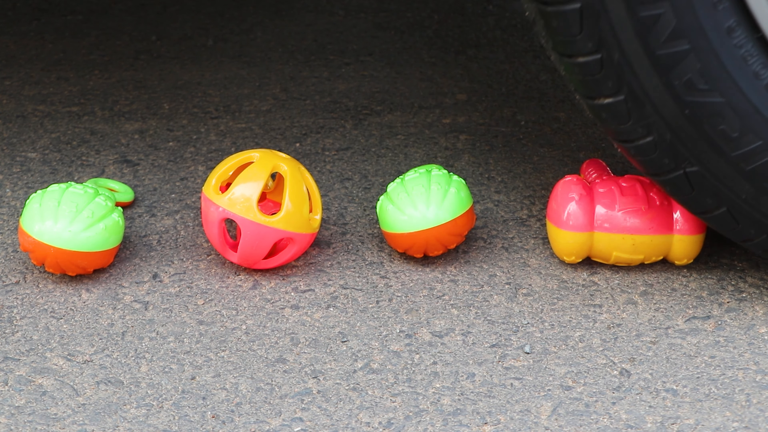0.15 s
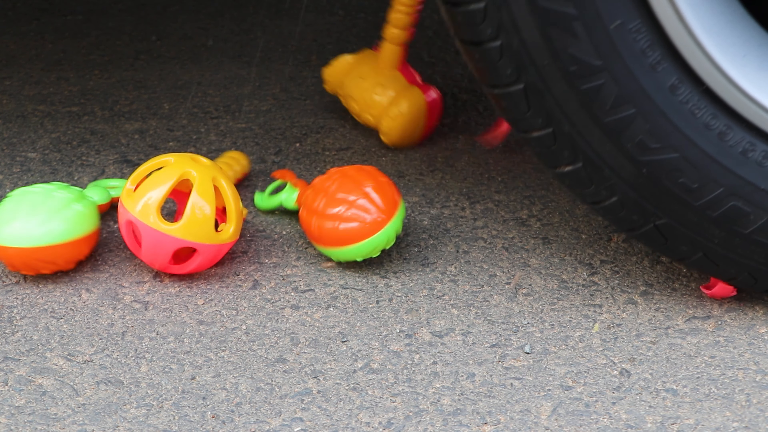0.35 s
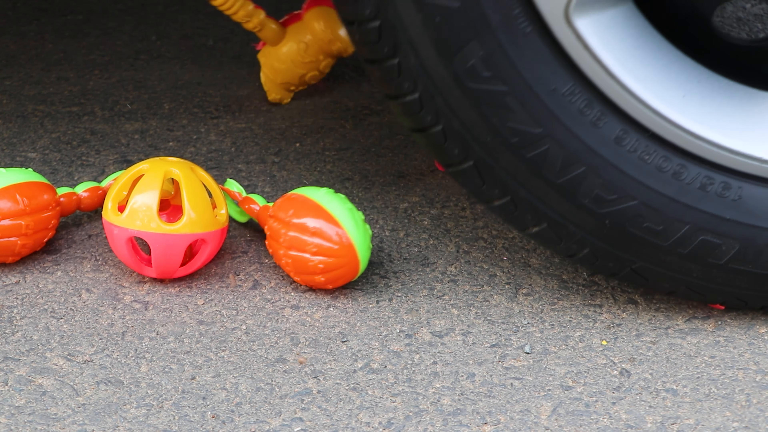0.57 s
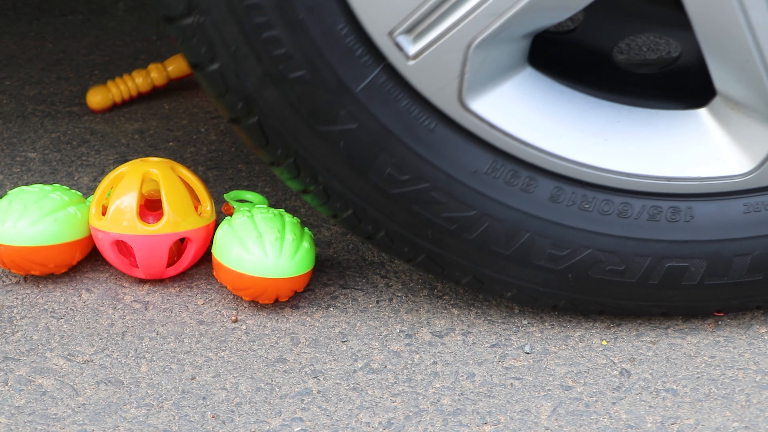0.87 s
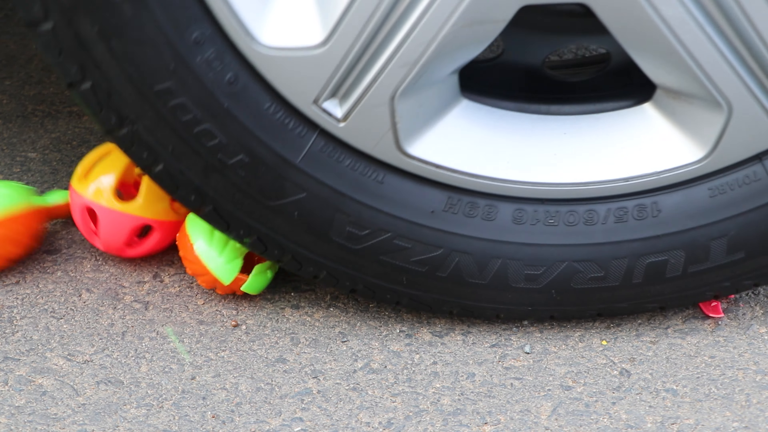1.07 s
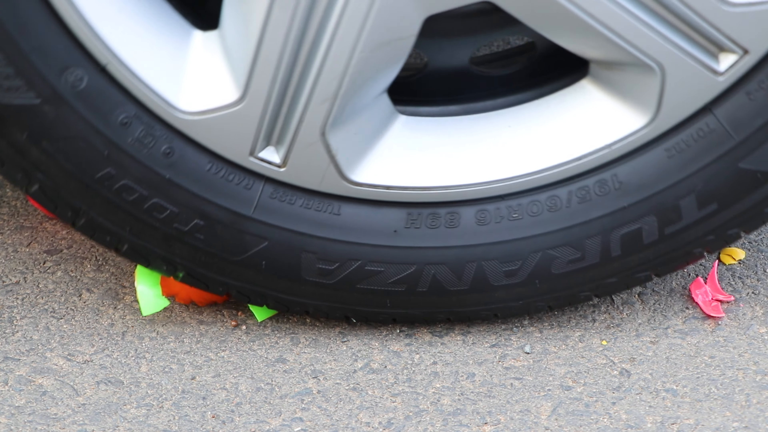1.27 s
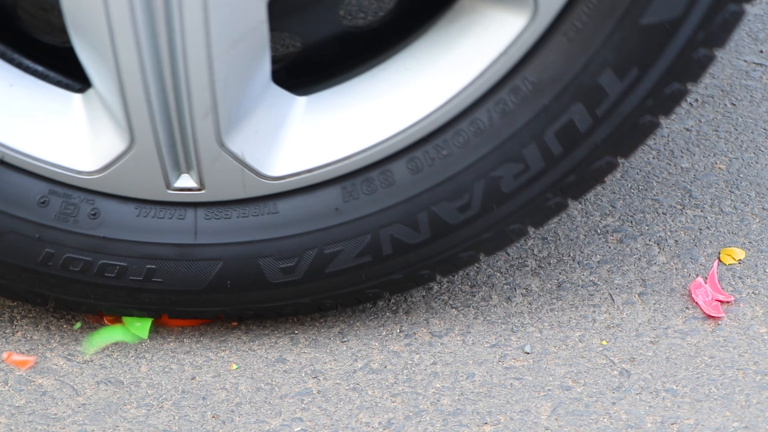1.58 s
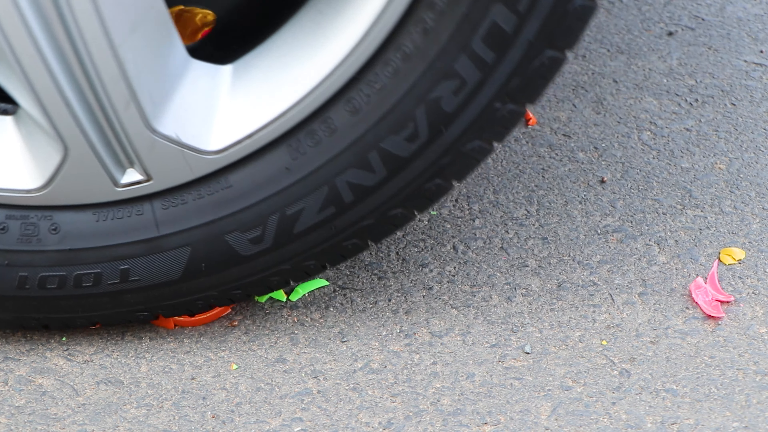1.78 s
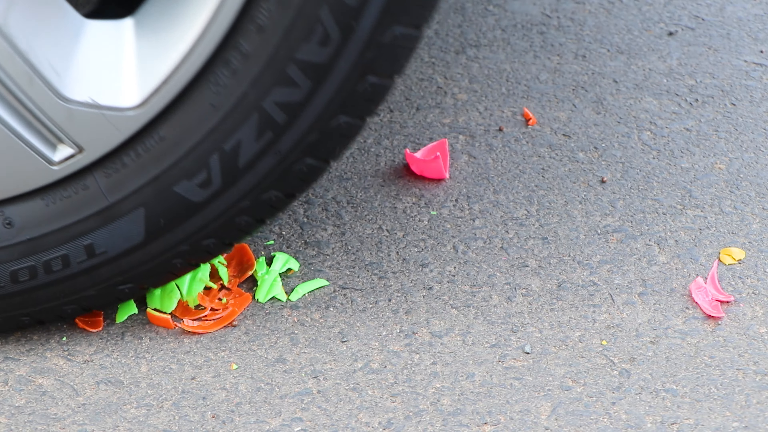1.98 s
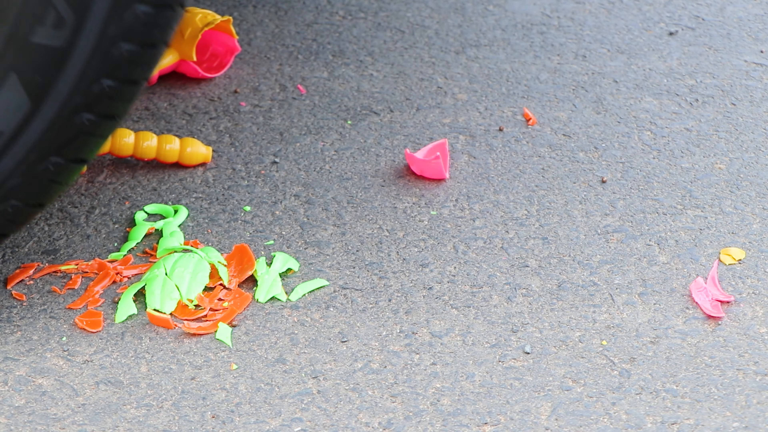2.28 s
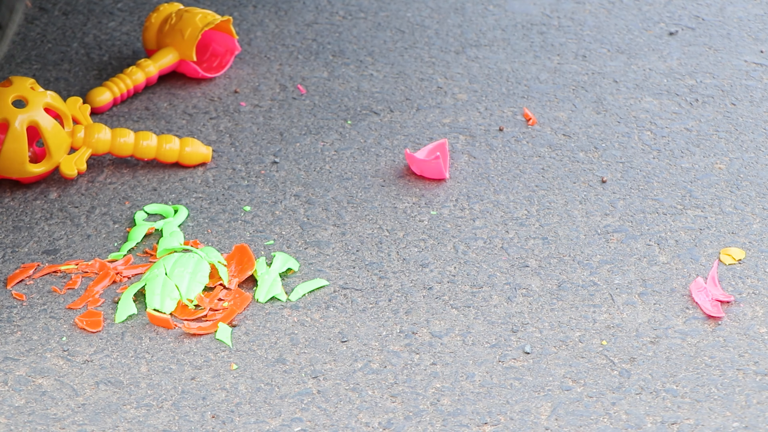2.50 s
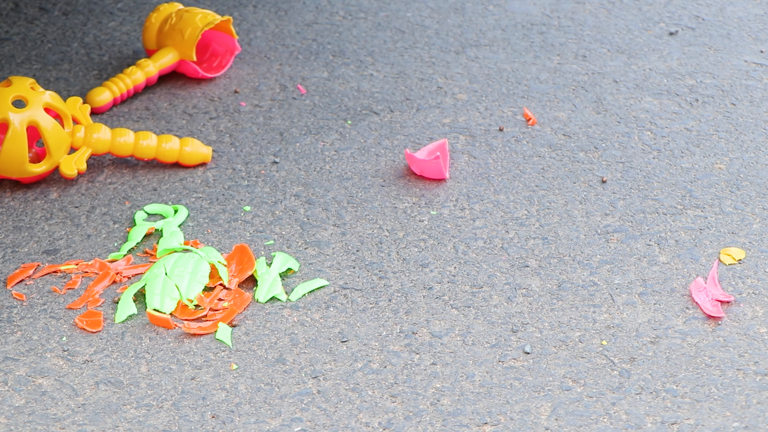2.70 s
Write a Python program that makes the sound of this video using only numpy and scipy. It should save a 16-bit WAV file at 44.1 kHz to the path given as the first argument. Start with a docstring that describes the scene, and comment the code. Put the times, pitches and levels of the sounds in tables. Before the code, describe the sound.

Close to the ground outdoors, a rolling tyre breaks plastic rattles; sharp opening cracks give way to clattering beads and shards, then thick crunching, a dull thump, a brief lull and sparse final snaps.

```python
"""Hollow hard-plastic rattles crack and knock under a slowly rolling car tyre, on asphalt beside a quiet street.
The microphone is close to the ground. Each break and its splinters ring shell, wall and fizz resonances.
Flurries of ticks make beads and shards rattle; heavy blows thump and faintly ring the air in the tyre.
The car's underside returns a short noise-like tail, filtered noise is the street, a few thin edges ping,
and the loudest cracks overload the recorder."""
import sys
import numpy as np
from scipy import signal
from scipy.fft import rfft, irfft
from scipy.io import wavfile

SR = 44100
rng = np.random.default_rng(int(sys.argv[2]) if len(sys.argv) > 2 else 0)


def wav_record(signal):
    """Record a signal, one row per channel, as 16-bit PCM in the file named by sys.argv[1]."""
    frames = np.transpose(np.atleast_2d(signal))
    bounded = np.clip(frames, -1, 1)
    # unit amplitude maps onto the largest positive 16-bit level
    quanta = np.round(bounded * 32767).astype(np.int16)
    wavfile.write(sys.argv[1], SR, quanta)


def volts(x):
    """Linear amplitude factor 10**(x/20) for a level x in dB, scalar or array-like."""
    e = np.asarray(x, float) / 20
    return 10 ** e


N = 125685
FIZZ_BAND_HZ = 8700, 15500  # shared by cracks and rattle


def rms_one(x):
    """Scales to rms 1."""
    return x / np.sqrt(np.mean(x ** 2) + 1e-20)


def in_time(rows):
    """Columns joined by straight lines in time."""
    s, *columns = np.transpose(rows)
    return [np.interp(np.arange(N) / SR, s, column) for column in columns]


def colour(x, points):
    """Minimum-phase filter through (frequency [Hz], gain [dB]) points on a log-frequency axis."""
    size = 4096
    hz, db = np.transpose(points)
    bins_hz = np.arange(size // 2 + 1) * SR / size
    gain = volts(np.interp(np.log(bins_hz + 1), np.log(hz), db))
    # folding the cepstrum onto positive times gives minimum phase
    cepstrum = irfft(np.log(gain))
    cepstrum[1:size // 2] *= 2
    cepstrum[size // 2 + 1:] = 0
    impulse = irfft(np.exp(rfft(cepstrum)))
    return signal.fftconvolve(x, impulse)[:len(x)]


def band(x, low_hz, high_hz):
    """Butterworth band-pass."""
    sos = signal.butter(3, [low_hz, min(high_hz, .45 * SR)], "band", fs=SR, output="sos")
    return signal.sosfilt(sos, x)


def ring(drive, hz, t60):
    """Two-pole resonance: a unit click starts a sine of height 1 that falls 60 dB in t60 seconds."""
    r, w = volts(-60 / (t60 * SR)), 2 * np.pi * hz / SR
    return signal.lfilter([0, np.sin(w)], [1, -2 * r * np.cos(w), r * r], drive + 1e-18)


def clicks(shape, per_s, spread_db):
    """Random clicks of either sign, at least 1 high, with a long-tailed size."""
    size = volts(spread_db * np.minimum(rng.exponential(1, shape), 4)) * rng.choice([-1, 1], shape)
    return size * (rng.random(shape) < per_s / SR)


# spectrum of the street behind the microphone: (frequency [Hz], relative density [dB])
STREET_SPECTRUM = [(18, -44), (30, -18), (106, -1.5), (259, -10.5), (512, -2), (760, 0), (2900, -3.5),
                   (5200, -19.5), (16000, -50.5)]
# how loud the street lies below the toys: (time [s], level [dB])
STREET_LEVELS = [(0, -65), (1.2, -67), (1.9, -62.5), (2.1, -79), (2.5, -70), (2.68, -81.5), (2.85, -81)]


def street():
    """Quiet outdoor noise, steady in colour, that sinks unevenly."""
    level_db, = in_time(STREET_LEVELS)
    noise = colour(rng.standard_normal(N + 4096), STREET_SPECTRUM)[4096:]  # skips the filter's start
    return volts(level_db) * rms_one(noise)


# beads and shards on the asphalt close to the microphone:
# (time [s], bright level [dB], hollow level [dB], fizz level [dB])
RATTLE_LEVELS = [(.19, -62.5, -81, -90.5), (.22, -46, -58.5, -45.5), (.27, -41, -34.5, -57),
                 (.37, -55.5, -73, -80), (.39, -31, -37, -63), (.47, -30.5, -55.5, -50),
                 (.52, -34.5, -45.5, -70), (.62, -36.5, -54.5, -59.5), (.7, -36, -75, -61.5),
                 (.8, -49.5, -51.5, -86.5), (.865, -47.5, -73, -77), (.88, -33.5, -28.5, -69),
                 (.945, -47.5, -76, -83), (.965, -45.5, -48.5, -74.5), (1.01, -37, -33.5, -79),
                 (1.035, -41, -63, -67.5), (1.07, -31, -40, -70), (1.13, -31, -50, -48),
                 (1.18, -46, -55.5, -68.5), (1.26, -38, -45.5, -53), (1.45, -44, -55, -69),
                 (1.64, -50.5, -54, -74.5), (1.7, -63, -57, -71.5), (1.84, -73.5, -65.5, -101),
                 (2.09, -71.5, -78, -104), (2.128, -32, -45, -42.5), (2.2, -54.5, -61, -82.5),
                 (2.3, -54.5, -57, -72), (2.502, -86, -71, -100), (2.509, -42, -39, -76.5),
                 (2.56, -70, -67.5, -91.5), (2.7, -91, -95, -105)]
# centre of the bright rattle: (time [s], pitch [Hz])
BRIGHT_PITCH = [(.39, 3600), (.45, 4270), (.52, 3820), (.8, 4900), (.88, 3400), (.93, 4480), (1.3, 3840),
                (1.84, 3450), (2.1, 3700), (2.4, 3400), (2.53, 4430)]
TICKS_PER_S, TICK_SPREAD_DB = 4500, 2.8
TUMBLES_PER_S, TUMBLE_SPREAD_DB, TUMBLE_DECAY_S = 120, 1.6, .007
TICK_BED = 1.5  # tick size between tumbles
BRIGHT_RANGE_HZ, BRIGHT_WIDTH_OCT, BRIGHT_CYCLES = (1900, 6970), .33, 55  # cycles to fall 60 dB
HOLLOW_HZ, HOLLOW_CYCLES = [970, 1040, 1130, 1204, 1366, 1736], 40
FIZZ_WASH = .35  # steady noise against rms-1 ticks


def rattle():
    """Tumbles set off flurries of ticks that ring bright resonances near the current pitch and hollow modes."""
    bright_db, hollow_db, fizz_db = in_time(RATTLE_LEVELS)
    centre_hz, = in_time(BRIGHT_PITCH)
    tumbles = np.abs(clicks(N, TUMBLES_PER_S, TUMBLE_SPREAD_DB))
    flurry = signal.lfilter([1], [1, -np.exp(-1 / (TUMBLE_DECAY_S * SR))], tumbles)
    ticks = clicks(N, TICKS_PER_S, TICK_SPREAD_DB) * (TICK_BED + flurry)

    # three ticks in four share their tumble's resonances, the others pick their own
    of_tumble = rng.integers(0, 84, N)[np.cumsum(tumbles > 0)]
    dealt = np.where(rng.random(N) < .75, of_tumble, rng.integers(0, 84, N))

    bright = np.zeros(N)
    pitches = np.geomspace(*BRIGHT_RANGE_HZ, 14)
    for k, hz in enumerate(pitches):
        nearness = np.exp(-.5 * (np.log2(hz / centre_hz) / BRIGHT_WIDTH_OCT) ** 2)
        bright += ring(ticks * nearness * (dealt % len(pitches) == k), hz, BRIGHT_CYCLES / hz)
    hollow = np.zeros(N)
    for k, hz in enumerate(HOLLOW_HZ):
        hollow += ring(ticks * (dealt % len(HOLLOW_HZ) == k), hz, HOLLOW_CYCLES / hz)
    fizz = rms_one(ticks * np.sqrt(flurry)) + FIZZ_WASH * rng.standard_normal(N)

    out = volts(bright_db) * rms_one(band(bright, 2300, 6000))
    out += volts(hollow_db) * rms_one(band(hollow, 650, 3700))
    return out + volts(fizz_db) * rms_one(band(fizz, *FIZZ_BAND_HZ))


# breaks under the tyre, levels before the gains below: (time [s], snap level [dB],
# shell pitch [Hz], snap pitch [Hz], shell level [dB], fizz level [dB])
BREAKS = [(0.1508, -42, 2070, 3500, -48.5, -89), (0.2168, -2.5, 2170, 3270, -17.5, -26.5),
          (0.2244, -1.5, 1730, 4300, -23, -53), (0.2451, 5, 1040, 3610, -17.5, -23),
          (0.2824, -12.5, 1130, 3200, -30, -49), (0.29, -9, 1130, 3250, -51, -66),
          (0.3538, -24, 1080, 4640, -75, -61), (0.3753, -17, 850, 3400, -41, -63),
          (0.382, -7.5, 1130, 3320, -31, -51), (0.4083, -16, 1130, 2570, -58, -58),
          (0.4397, -22, 1110, 4530, -28, -52.5), (0.4536, -57, 2370, 3620, -23.5, -60),
          (0.4822, -37, 2137, 3020, -19, -62), (0.5044, -48, 1270, 3070, -39, -67.5),
          (0.5375, -18, 1210, 3820, -24, -54), (0.5654, -17, 956, 2750, -40, -65),
          (0.5909, -17, 1140, 4260, -20.5, -58), (0.601, -13.5, 1160, 4950, -58, -48),
          (0.6482, -20, 2230, 3920, -27, -44.5), (0.726, -36, 1900, 4700, -65, -68),
          (0.7546, -5.5, 2163, 3160, -26.5, -43.5), (0.756, -30, 850, 4830, -32.5, -54),
          (0.7926, -16, 976, 4440, -41, -55.5), (0.8724, -11, 1340, 3320, -26, -56),
          (0.931, -21, 1500, 3980, -79, -83.5), (0.9498, -22, 1070, 4100, -46, -79.5),
          (1.0027, -17.5, 1240, 3300, -43, -64), (1.0447, -16.5, 1162, 4300, -34, -67),
          (1.066, -19, 1290, 4250, -29.5, -50.5), (1.0973, 3.5, 1342, 4280, -54, -29),
          (1.1083, -4.5, 1360, 4800, -23, -26), (1.128, 0.5, 955, 3700, -15, -25),
          (1.197, -22.5, 1850, 4100, -35.5, -69.5), (1.2075, -12.5, 1430, 4200, -33, -42.5),
          (1.237, -1, 1460, 3520, -19, -33), (1.257, -22, 1480, 3600, -15, -52),
          (1.279, -4, 1710, 3690, -21.5, -48), (1.3008, -15, 1420, 3130, -27.5, -46.5),
          (1.3136, -11, 2010, 3000, -25.5, -44.5), (1.335, -20, 1960, 3000, -17, -33.5),
          (1.358, -14, 1900, 4050, -28.5, -42), (1.3815, -12.5, 2390, 3270, -23, -39),
          (1.4066, -8, 2400, 3480, -23.5, -34.5), (1.4209, -30, 1540, 3240, -29, -43),
          (1.4642, -14, 1900, 3420, -26.5, -46.5), (1.489, -13, 920, 3900, -24.5, -39.5),
          (1.51, -8, 950, 3840, -28.5, -39), (1.5374, -4, 1390, 3320, -21, -64),
          (1.567, -7, 1120, 3470, -24.5, -40), (1.6194, -7.5, 1950, 3580, -22, -44.5),
          (1.6661, -9, 685, 3160, -24.5, -40.5), (1.6764, -6.5, 1060, 3700, -16.5, -38.5),
          (1.6774, -20, 2230, 3000, -20, -33), (1.71, -23.5, 1045, 3670, -16, -49),
          (1.746, -35.5, 2280, 4170, -44.5, -74), (1.753, -27.5, 2050, 3950, -49, -55.5),
          (1.764, -5.5, 1200, 3240, -19, -35.5), (1.7802, -14.5, 1730, 3400, -19.5, -48),
          (1.8597, -9.5, 1040, 3180, -18, -51.5), (1.9036, -5.5, 830, 3540, -11.5, -39.5),
          (2.1262, -6.5, 1130, 3080, -13.5, -47.5), (2.128, -9, 2000, 4730, -38, -59.5),
          (2.138, -16.5, 850, 3200, -25, -56.5), (2.2148, -23, 1540, 3300, -40.5, -79),
          (2.22, -12.5, 970, 3920, -34, -60.5), (2.2455, -8, 1450, 3180, -21.5, -48.5),
          (2.2719, -4, 1520, 3430, -16.5, -79), (2.2947, -23, 1110, 3110, -37.5, -87.5),
          (2.3336, -52, 1490, 3120, -57.5, -84), (2.3543, -9, 1296, 3130, -13.5, -79.5),
          (2.358, -13.5, 650, 2900, -22, -81), (2.4306, -35, 1560, 2540, -23, -84),
          (2.5139, -42, 1940, 2946, -29, -67), (2.5349, -21, 2050, 2890, -51.5, -82.5),
          (2.5781, -24, 1364, 3470, -21, -73), (2.6538, -54.5, 2230, 3500, -52, -66.5)]
# how long the splinters of a break keep flying: (time [s], 60 dB decay [s])
SPLINTER_DECAY = [(1.6, 0.015), (1.76, 0.009), (1.95, 0.0015), (2.126, 0.013), (2.22, 0.019)]
# modes of the hollow shell: (multiple of pitch, relative level [dB], 60 dB decay [cycles])
SHELL_MODES = [(0.758, -19.5, 3.2), (1.0, -8, 8.3), (1.4, -14.5, 4.3), (1.951, -20.5, 7.)]
# modes of the snapping wall: (multiple of pitch, relative level [dB], 60 dB decay [cycles])
SNAP_MODES = [(.8, -18, 6.8), (1.0, 7.2, 25), (1.25, -10, 45)]
# low body of a toy ground flat under the tyre: (frequency [Hz], 60 dB decay [s])
FLAT_MODES = [(340, 0.012), (560, 0.022)]
# level of that body against the shell level in BREAKS: (time [s], level [dB])
FLAT_LEVELS = [(1.05, -38), (1.3, -32), (1.56, -11), (1.72, -29.5), (2.25, -15.5), (2.4, -48.5)]
SHELL_GAIN_DB, SNAP_GAIN_DB, FIZZ_GAIN_DB = -10.5, -24.5, -11
SPLINTERS_PER_S, SPLINTER_SPREAD_DB = 5000, 5
SMALLEST_SPLINTER_DB = -15.5  # against the break, before the decay
MODE_SPREAD_DB = 3


def ring_modes(drive, modes, pitch_hz):
    """A body of several modes, each varied a little in level from break to break."""
    out = np.zeros(len(drive))
    for multiple, db, cycles in modes:
        hz = multiple * pitch_hz
        out += volts(db + MODE_SPREAD_DB * rng.standard_normal()) * ring(drive, hz, cycles / hz)
    return out


def cracks():
    """A break, then a dying spray of splinters, rings shell, snapping wall, flattened body and bright fizz."""
    span = SR // 8
    out, t = np.zeros(N + span), np.arange(span) / SR
    for s, snap_db, shell_hz, snap_hz, shell_db, fizz_db in BREAKS:
        burst = volts(SMALLEST_SPLINTER_DB) * clicks(span, SPLINTERS_PER_S, SPLINTER_SPREAD_DB)
        burst[0] = 1  # the break itself
        drive = burst * volts(-60 * t / np.interp(s, *np.transpose(SPLINTER_DECAY)))

        shell = band(ring_modes(drive, SHELL_MODES, shell_hz), shell_hz * 0.74, shell_hz * 2.38)
        snap = band(ring_modes(drive, SNAP_MODES, snap_hz), 1850, 6600)
        flat = sum(ring(drive, hz, t60) for hz, t60 in FLAT_MODES)
        fizz = band(drive, *FIZZ_BAND_HZ)

        flat_db = shell_db + np.interp(s, *np.transpose(FLAT_LEVELS))
        parts = [(shell_db + SHELL_GAIN_DB, shell), (flat_db, flat),
                 (snap_db + SNAP_GAIN_DB, snap), (fizz_db + FIZZ_GAIN_DB, fizz)]
        start = int(s * SR)
        for db, part in parts:
            # 0 dB holds the energy of 10 ms at rms 1
            out[start:start + span] += volts(db) * part / np.sqrt(np.sum(part ** 2) / (.01 * SR))
    return out[:N]


TAIL_DB, TAIL_GAP_S = -13.5, 0.0026
TAIL_T60_S, TAIL_SHORTENS = 0.1, 0.14  # decay at 1 kHz, and the power of frequency that shortens it


def underside(x):
    """Dense echoes between road and car, higher bands dying faster."""
    t = np.arange(SR // 4) / SR
    tail = np.zeros(len(t))
    for hz in np.geomspace(300, 6900, 6):
        t60 = TAIL_T60_S * (hz / 1000) ** -TAIL_SHORTENS
        tail += band(rng.standard_normal(len(t)), hz / 1.37, hz * 1.37) * volts(-60 * t / t60)
    gap = np.zeros(int(TAIL_GAP_S * SR))
    tail = np.concatenate([gap, tail / np.sqrt(np.sum(tail ** 2))])
    return volts(TAIL_DB) * signal.fftconvolve(x, tail)[:N]


# heavy blows on the tyre: (time [s], thump level [dB], air drive level [dB])
TYRE_BLOWS = [(0.22, -34, -62), (0.244, -64, -61), (1.538, -71, -65.5), (1.766, -40, -74),
              (1.9047, -14, -62.5), (2.353, -70.5, -69)]
# resonances of the air inside: (frequency [Hz], level against the air drive [dB], 60 dB decay [s])
AIR_MODES = [(233.6, 4.5, 1.3), (673, -1, 0.14), (907, -3, .8)]


def tyre():
    """A heavy blow pushes a dull thump and leaves the air in the tyre ringing."""
    s, thump_db, air_db = np.transpose(TYRE_BLOWS)
    at = (s * SR).astype(int)
    push, air = np.zeros((2, N))
    push[at], air[at] = volts(thump_db), volts(air_db)
    thump = ring(push, 175, t60=.012)
    return thump + sum(volts(db) * ring(air, hz, t60) for hz, db, t60 in AIR_MODES)


# a short high ping on a few breaks: (time [s], starting level [dB])
EDGE_PINGS = [(1.7643, -21.5), (1.8597, -39.5), (1.9042, -17.5)]


def pings():
    """A thin edge flicks free and rings for a few cycles."""
    s, db = np.transpose(EDGE_PINGS)
    flick = np.zeros(N)
    flick[(s * SR).astype(int)] = volts(db)
    return ring(flick, 8100, t60=.003)


def scene():
    """Small toys radiate little bass; their tail, the pings, the tyre and the street join them."""
    no_bass = signal.butter(4, 302, "high", fs=SR, output="sos")
    toys = signal.sosfilt(no_bass, cracks() + rattle())
    return (toys + underside(toys) + pings() + tyre() + street())[None]


def low_pass(x):
    """Removes everything above the highest recorded frequency."""
    return signal.sosfilt(signal.butter(12, 16820, fs=SR, output="sos"), x)


def record(dry):
    """The recorder's input flattens the loudest cracks near its ceiling, then deep bass is cut."""
    ceiling = .31
    held = dry / (1 + np.abs(dry / ceiling) ** 8) ** (1 / 8)
    low_cut = signal.butter(2, 70, "high", fs=SR, output="sos")
    finished = signal.sosfilt(low_cut, held)
    return low_pass(finished)


dry = scene()
out = record(dry)
wav_record(out)
```